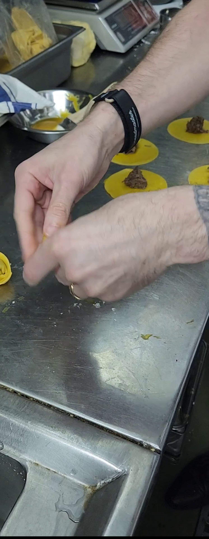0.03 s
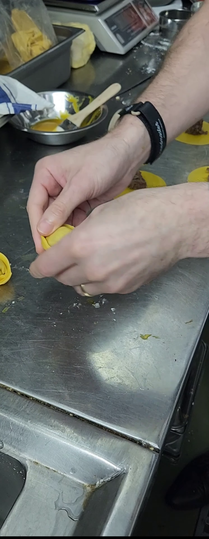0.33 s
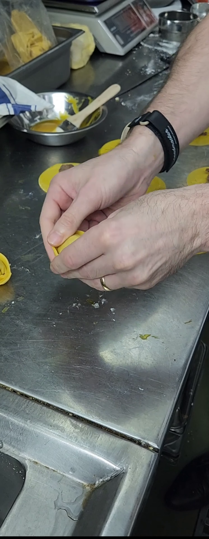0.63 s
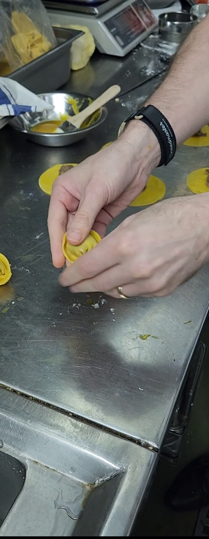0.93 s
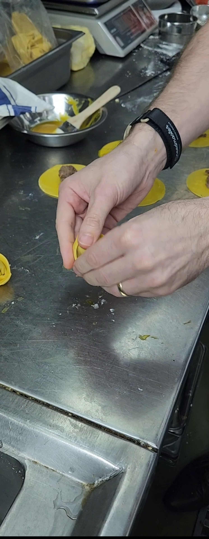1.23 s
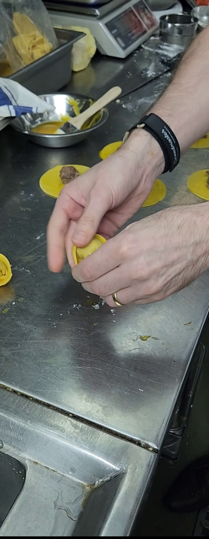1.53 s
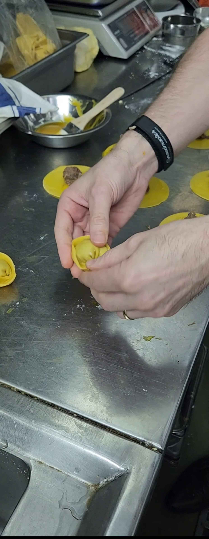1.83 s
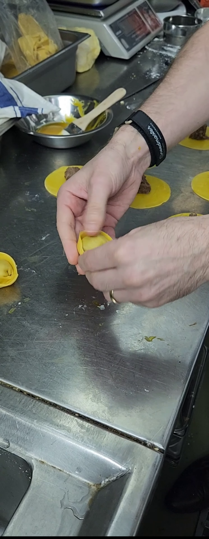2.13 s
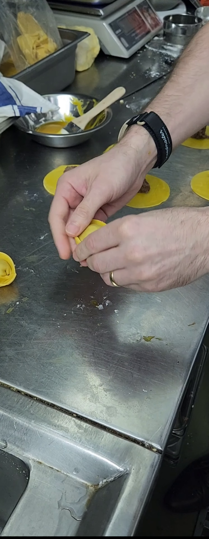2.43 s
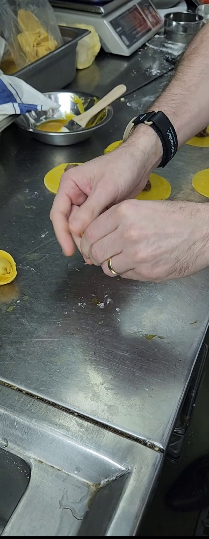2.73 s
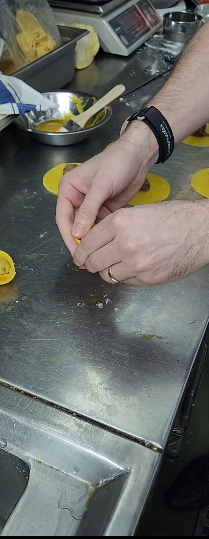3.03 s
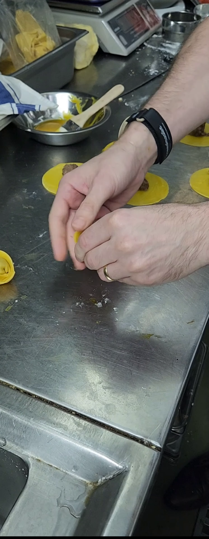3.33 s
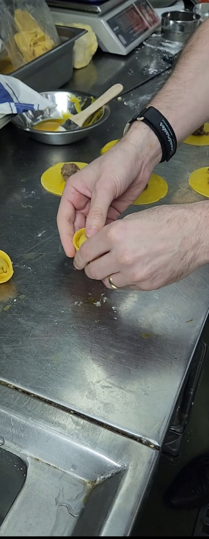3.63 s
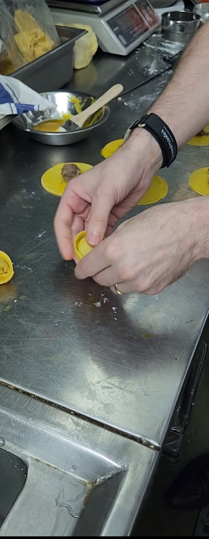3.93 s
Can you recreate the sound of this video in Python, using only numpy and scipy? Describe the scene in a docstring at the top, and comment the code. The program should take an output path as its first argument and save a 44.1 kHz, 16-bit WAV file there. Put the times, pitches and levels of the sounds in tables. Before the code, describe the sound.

Kitchen ventilation runs steadily from the start to the end at about 4 seconds. A low motor hum throbs unevenly over a deep rumble in the ducts, while softer air rushes through the hood with a faint whistle, all leaning slightly to the left. At about 2.7 seconds something gives one soft, dull bump on the left, and the ventilation runs on unchanged.

```python
"""Kitchen ventilation runs steadily, heard through two microphone ports a hand apart.
From the start, motors throb and hum on the mains, turbulence rumbles in the ducts,
and air rushes through the hood, whose resonances add a faint whistle.
About two thirds of the way in, something bumps softly on the left; the ventilation runs on."""
import sys
import numpy as np
from scipy import signal
from scipy.fft import rfft, irfft
from scipy.io import wavfile

SR = 44100
rng = np.random.default_rng(int(sys.argv[2]) if len(sys.argv) > 2 else 0)


def persist_wave(psi):
    """Save psi, clipped to +-1, as 16-bit WAV."""
    counts = np.round(np.clip(psi, -1, 1) * 32767).astype(np.int16)
    wavfile.write(sys.argv[1], SR, np.atleast_2d(counts).T)


N = 176400

# Hum tones, lowest first: pitch_hz, level_db, left_over_right_db
HUM_TONES = [(100.2, -2.5, 1.6), (300.2, -30.5, 2.5)]
# Throb, added to the lowest tone's level: time_s, gain_db
HUM_THROB = [(0, -10.5), (.2, -19), (.66, -15), (.76, -18.5), (.84, -29), (.93, -13), (1.16, -21),
             (1.25, -14.5), (1.36, -19.5), (1.88, -14), (2.02, -25), (2.16, -15), (2.48, -16.5),
             (2.6, -21.5), (2.8, -13), (3.28, -20), (3.5, -13.5), (4, -17)]
def motor_hum(waver_db=0.95, waver_hz=6.2, waver_turns=0.014):
    """The motors' magnetic pull hums with an odd overtone; both waver, and the low tone throbs."""
    t, hum = np.arange(N) / SR, np.zeros((2, N))
    for k, (pitch_hz, level_db, side_db) in enumerate(HUM_TONES):
        swell_db = envelope(HUM_THROB) if k == 0 else waver_db * drift(waver_hz)
        turns = pitch_hz * t + rng.random() + waver_turns * drift(waver_hz)
        hum += amp(level_db + swell_db) * pan(side_db) * unit(np.sin(2 * np.pi * turns))
    return hum


# Tone colour of the rumble: freq_hz, relative_db
RUMBLE_COLOUR = [(15, -12), (25, -24), (34, 3), (46, 0.5), (56, -3), (85, 1.5), (98, 2.5), (110, -4.5),
                 (135, -6.5), (178, -6), (200, -15.5), (236, -5.5), (262, -19), (290, -13), (325, -19),
                 (385, -18), (440, -28), (800, -62)]
# How alike the rumble is at the two ports: freq_hz, likeness_ratio
RUMBLE_LIKENESS = [(45, .945), (100, .95), (150, .86), (200, .85), (250, .92), (330, .8), (420, .75)]
# Stereo balance of the rumble: freq_hz, left_over_right_db
RUMBLE_BALANCE = [(60, 1.7), (100, 2), (150, 4.2), (230, 3.7), (340, -.5)]
# Slow rise and fall of the rumble: time_s, level_db
RUMBLE_LEVEL = [(0, -21.5), (1.25, -19), (1.8, -21.5), (2.25, -21), (2.8, -17.5), (3.25, -21), (3.6, -20),
                (4, -21)]
def duct_rumble(swell_db=1.13, swell_hz=2.5):
    """Turbulence booms in the ducts and the low modes of the room."""
    boom = noise_pair(curve(RUMBLE_COLOUR), curve(RUMBLE_LIKENESS), curve(RUMBLE_BALANCE))
    return boom * amp(envelope(RUMBLE_LEVEL) + swell_db * drift(swell_hz))


# Tone colour of the rushing air: freq_hz, relative_db
AIR_COLOUR = [(100, -3.5), (350, -1.5), (500, -2.5), (650, -2.5), (920, -5.5), (1180, -4), (1400, -9.5),
              (1650, -12), (2300, -13), (2900, -15), (3500, -16), (4700, -19), (5100, -21.5), (6000, -23.5),
              (7600, -21.5), (8400, -25.5), (9200, -36.5), (9900, -37), (11400, -31.5), (13000, -33.5),
              (14800, -32), (16000, -37)]
# Narrow, whistling resonances of the hood and fan: pitch_hz, width_hz, lift_db
HOOD_RESONANCES = [(382, 20, 4), (460, 18, 6), (847, 25, 3), (963, 14, 4), (4345, 30, 2.5), (7455, 12, 4.5),
                   (8230, 12, 3)]
# Part of the rush that arrives straight from the left: freq_hz, share_ratio
AIR_DIRECT = [(400, 0.57), (800, 0.19), (1600, 0.27), (3000, 0.18), (5000, 0.15), (9000, 0.035)]
# Stereo balance of the rush: freq_hz, left_over_right_db
AIR_BALANCE = [(480, 0), (720, 4.5), (1300, 4), (2200, 2), (3000, 5), (3700, -0.5), (5400, 3.5), (7300, 5),
               (8800, 1), (11500, -2), (15500, -1)]
def hood_air(level_db=-30, swell_db=0.57, swell_hz=5.2):
    """Air rushes through the hood: mostly diffuse, partly direct from the left."""
    port_spacing_s, direct_lag_s = 0.00061, 0.00044  # as travel times of sound
    f, direct_share = bins(), curve(AIR_DIRECT)
    diffuse = np.sinc(2 * f * port_spacing_s)  # sound from all sides is alike only in the lows
    direct = np.exp(-2j * np.pi * f * direct_lag_s)  # reaches the right port later
    likeness = (1 - direct_share) * diffuse + direct_share * direct
    whistle_db = sum(db / (1 + (2 * (f - hz) / width) ** 2) for hz, width, db in HOOD_RESONANCES)
    ripple_db = np.array([room_ripple(), room_ripple()])
    rush = noise_pair(curve(AIR_COLOUR) + whistle_db + ripple_db, likeness, curve(AIR_BALANCE))
    return rush * amp(level_db + swell_db * drift(swell_hz))


# One soft bump: peak_time_s, pitch_hz, level_db
BUMP_HITS = [(2.706, 180, -14.5)]
def soft_bump(peak_time_s, pitch_hz, level_db, fade_s=0.02):
    """A dull low thud to the left that swells and dies within a few cycles."""
    t = np.arange(N) / SR - peak_time_s
    thud = np.exp(-(t / fade_s) ** 2) * np.cos(2 * np.pi * pitch_hz * t)
    return amp(level_db) * thud * pan(side_db=10)


def room_ripple(depth_db=0.7, spacing_hz=22):
    """Fine random peaks and dips (dB) that the room's reflections leave in one port's spectrum."""
    f = bins()
    heights = rng.standard_normal(len(f))
    return depth_db * unit(np.interp(f / spacing_hz, np.arange(len(f)), heights))


def noise_pair(colour_db, likeness, side_db):
    """Coloured noise of rms 1 at the two ports, with a given likeness and balance."""
    left = white()
    right = likeness * left + np.sqrt(np.maximum(1 - abs(likeness) ** 2, 0)) * white()
    return unit(irfft(np.array([left, right]) * amp(colour_db) * pan(side_db), N))


def drift(rate_hz):
    """A slow random wander of rms 1, up to about rate_hz."""
    lowpass = np.exp(-(bins() / rate_hz) ** 2) * (bins() > 0)
    return unit(irfft(white() * lowpass, N))


def white():
    """A random flat spectrum."""
    return rfft(rng.standard_normal(N))


def envelope(points):
    """Joins (time_s, value) points with straight lines."""
    return np.interp(np.arange(N) / SR, *np.transpose(points))


def curve(points):
    """Joins (freq_hz, value) points on a log-frequency axis."""
    f, value = np.transpose(points)
    return np.interp(np.log(bins() + 1), np.log(f + 1), value)


def bins():
    """Frequencies of the whole-length spectrum."""
    return np.fft.rfftfreq(N, 1 / SR)


def pan(side_db):
    """Left and right gains for a level difference."""
    return amp(np.array([[.5], [-.5]]) * side_db)


def amp(db):
    """Decibels to gain."""
    return 10 ** (np.asarray(db) / 20)


def unit(x):
    """Scales to rms 1."""
    return x / np.sqrt(np.mean(abs(x) ** 2) + 1e-20)


def scene():
    """A bed of hum, rumble and air, with the one bump on top."""
    return motor_hum() + duct_rumble() + hood_air() + sum(soft_bump(*hit) for hit in BUMP_HITS)


def record(dry):
    """The recorder's steep band limit cuts the very top of the hiss."""
    lowpass = signal.firwin(1023, cutoff=15780, window=("kaiser", 9), fs=SR)
    return signal.oaconvolve(dry, lowpass[None], "same")


dry = scene()
out = record(dry)
persist_wave(out)
```